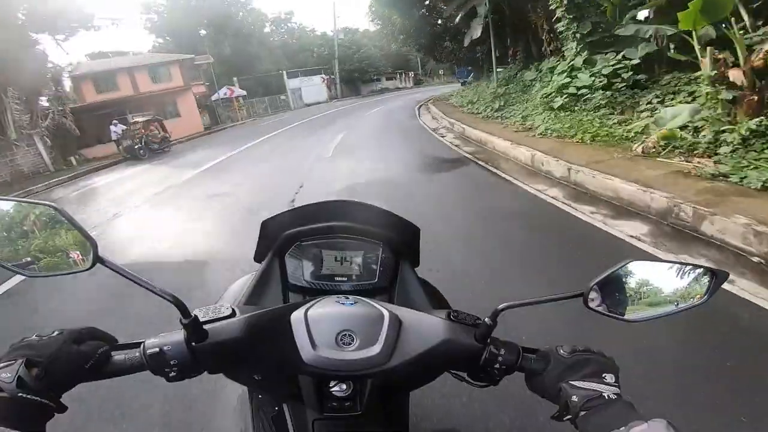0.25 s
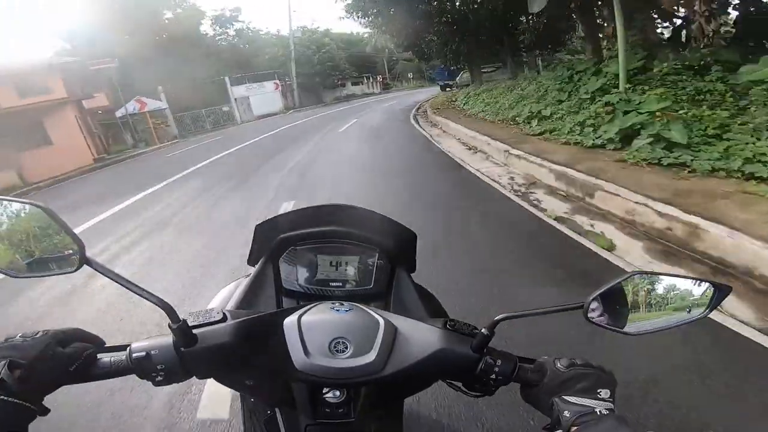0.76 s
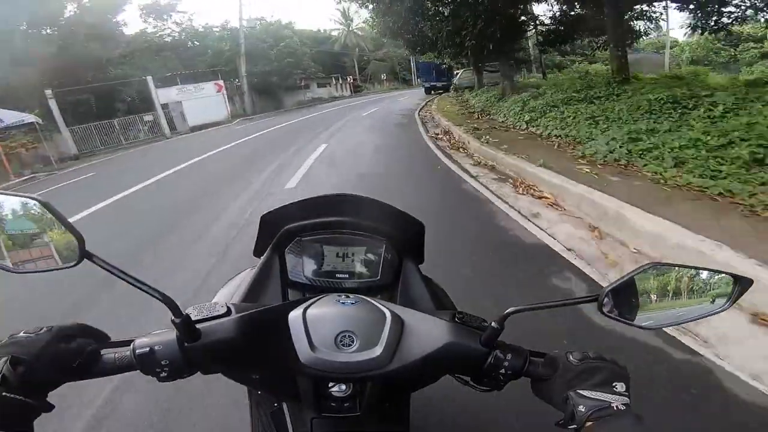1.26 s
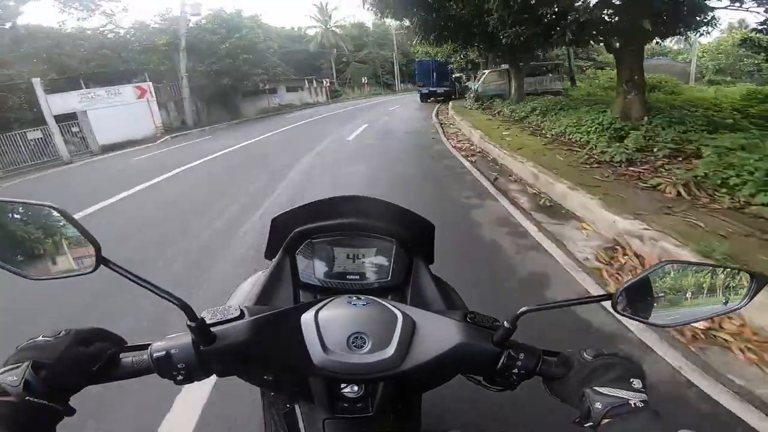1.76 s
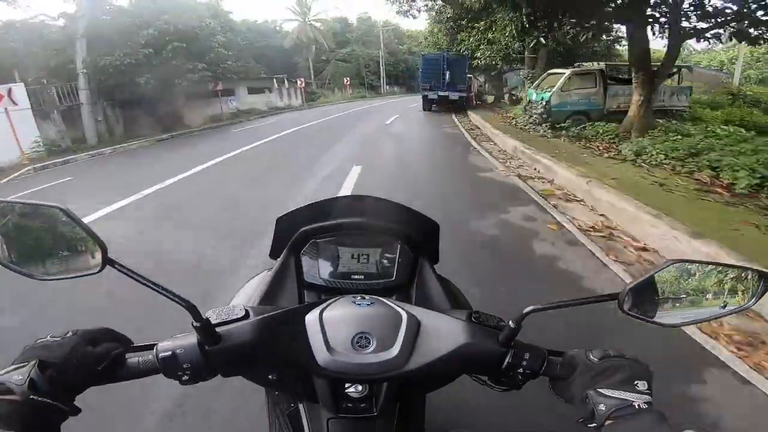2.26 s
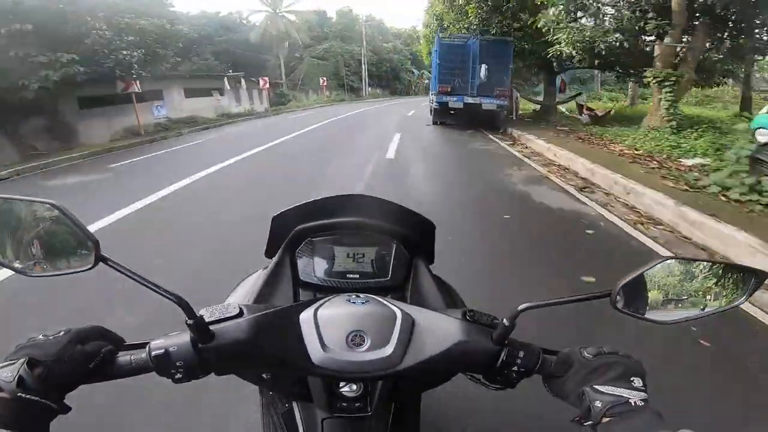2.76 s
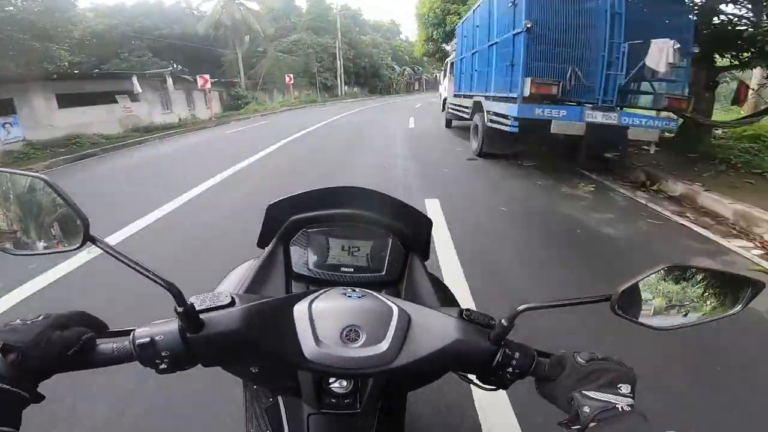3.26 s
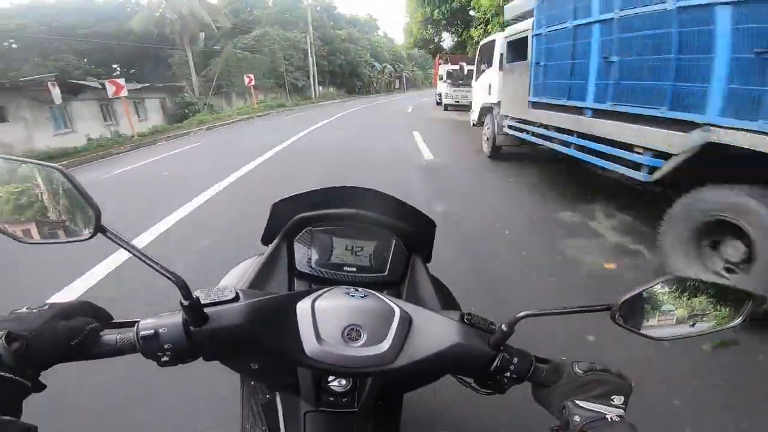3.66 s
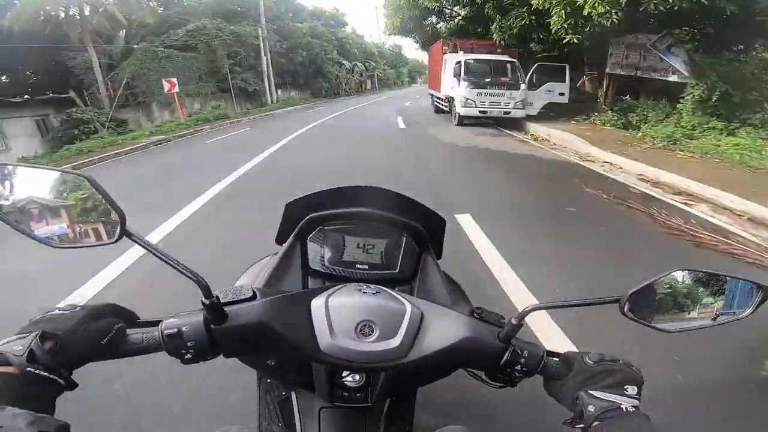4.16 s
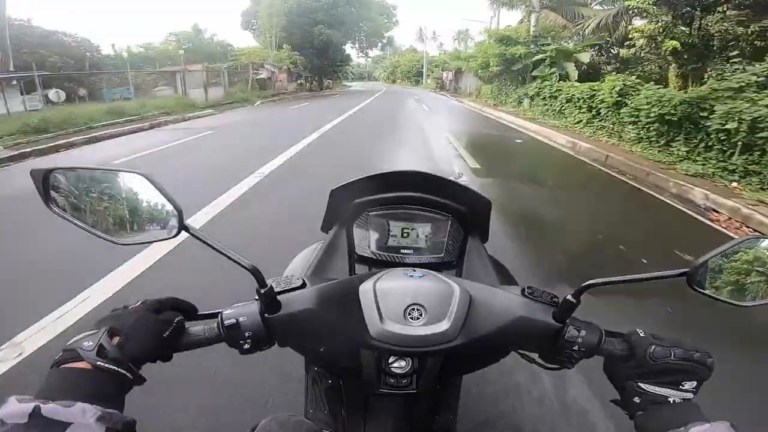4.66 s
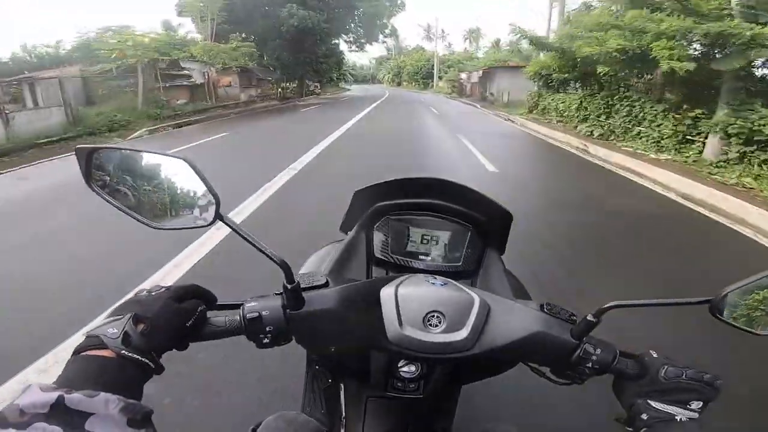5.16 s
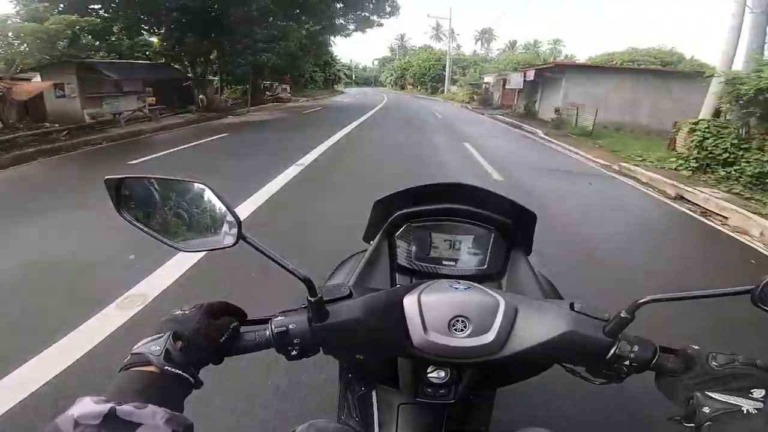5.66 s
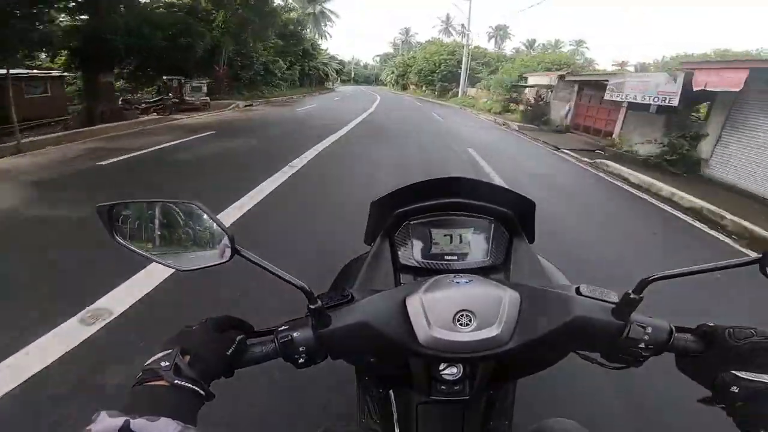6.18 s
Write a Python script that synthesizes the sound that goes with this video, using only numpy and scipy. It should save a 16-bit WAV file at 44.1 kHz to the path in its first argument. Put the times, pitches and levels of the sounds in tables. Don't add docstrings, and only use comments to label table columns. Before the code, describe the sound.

A small scooter drones along a wet road under rumbling wind, with a few bird whistles, then clicks abruptly into a faster, much louder ride.

```python
import sys
import numpy as np
from scipy import signal
from scipy.fft import rfft, irfft, next_fast_len
from scipy.io import wavfile
from scipy.ndimage import uniform_filter1d

SR = 44100
rng = np.random.default_rng(int(sys.argv[2]) if len(sys.argv) > 2 else 0)


def transcribe(u):
    v = np.clip(np.atleast_2d(u).T, -1, 1)
    q = np.round(v * 32767).astype(np.int16)
    wavfile.write(sys.argv[1], SR, q)


def volts_from_db(level):
    exponent = np.asarray(level, float) / 20
    return 10 ** exponent


N = 283122
TIME = np.arange(N) / SR


def level(x, db):
    return x * volts_from_db(db) / np.sqrt(np.mean(x ** 2))


def curve(table):
    s, *columns = np.transpose(table)
    return [np.interp(TIME, s, c) for c in columns]


def walk(rate_hz):
    k = int(SR / rate_hz)
    held = np.repeat(rng.standard_normal(N // k + 1), k)
    return 1.3 * uniform_filter1d(uniform_filter1d(held, k), k)[:N]


def plateau(centre_s, half_s):
    return np.exp(-((TIME - centre_s) / half_s) ** 4)


def ride(track, orders, wind, road, spray, tone_db, gear_db, shake, smear, wind_db, road_db, spray_db):
    # t/s, half length/s, level/dB
    patches = [
        (0.799, 0.14, 1),
        (2.9, 0.27, 0.5),
        (5.5, 0.59, 0.3),
    ]
    firing_hz, gust_db = curve(track)
    lorry_db = 3.5 * plateau(4, 0.4)
    wet_db = sum(db * plateau(s, half_s) for s, half_s, db in patches)
    throttle_db = 0.5 * (firing_hz - np.mean(track, axis=0)[1]) + lorry_db / 3
    cycles = np.cumsum(firing_hz * (1 + 0.001 * walk(8))) / SR
    throb = shake * (np.cos(2 * np.pi * cycles) + 0.7 * np.cos(4 * np.pi * cycles))

    motor = volts_from_db(tone_db) * exhaust(firing_hz, cycles, orders, wander_db=1.4, slip=0.3, smear=smear)
    motor = motor + volts_from_db(gear_db) * valve_gear(cycles, scatter_db=2.5, case_hz=1350, width_hz=350)
    air = volts_from_db(gust_db + wind_db) * wind_buffet(wind)
    tyres = volts_from_db(lorry_db + 0.078 * gust_db + road_db) * (1 + throb) * tyre_roar(road)
    hiss = volts_from_db(0.13 * gust_db + wet_db + spray_db) * (1 + throb / 3) * spray_hiss(spray)
    fizz = volts_from_db(spray_db - 21) * wet_db * patch_fizz()
    return air + tyres + hiss + fizz + volts_from_db(throttle_db) * motor


def exhaust(hz, cycles, orders, wander_db, slip, smear):
    out = 0
    for k, order_db in orders:
        lift_db = body_db(k * hz)
        db = order_db + lift_db - lift_db.mean() + wander_db * walk(7)
        phase = 2 * np.pi * (k * cycles + smear * rng.random()) + slip * walk(6)
        out = out + volts_from_db(db) * np.sin(phase)
    return out


def body_db(hz):
    # f/Hz, width/Hz, level/dB
    body = [
        (423, 24, 9),
        (460, 22, 5),
        (1545, 70, 9),
    ]
    return sum(db / (1 + (2 * (hz - f) / w) ** 2) for f, w, db in body)


def valve_gear(cycles, scatter_db, case_hz, width_hz):
    knocks = np.diff(np.floor(cycles), prepend=0) * volts_from_db(scatter_db * rng.standard_normal(N))
    b, a = signal.iirpeak(case_hz, case_hz / width_hz, fs=SR)
    return level(signal.lfilter(b, a, signal.lfilter(b, a, knocks)), 0)


def wind_buffet(spectrum):
    return rush(spectrum, swell_db=0.6, flicker_db=1.1, flicker_hz=9)


def tyre_roar(spectrum):
    return rush(spectrum, swell_db=0.5, flicker_db=1.5, flicker_hz=10)


def spray_hiss(spectrum):
    return rush(spectrum, swell_db=0.5, flicker_db=0.9, flicker_hz=18)


def patch_fizz():
    return rush([(5000, -6), (8000, 2.5), (11000, -13)], swell_db=2.5, flicker_db=3, flicker_hz=25.1)


def rush(spectrum, swell_db, flicker_db, flicker_hz):
    hz, db = np.transpose(spectrum)
    size = next_fast_len(N)
    octave = np.log2(np.maximum(np.arange(size // 2 + 1) * SR / size, 1))
    colour_db = np.interp(octave, np.log2(hz), db, left=-99, right=-99)
    noise = rfft(rng.standard_normal(size)) * volts_from_db(colour_db)
    out, swell = 0, swell_db * walk(2.79)
    for centre in np.arange(np.log2(hz[0]), np.log2(hz[-1]) + 0.5, 0.5):
        weight = np.clip(1 - 2 * np.abs(octave - centre), 0, 1)
        band = irfft(noise * weight, size)[:N]
        out = out + band * volts_from_db(swell + flicker_db * walk(flicker_hz))
    return level(out, 0)


def birds():
    # t/s, length/s, top f of strongest partial/Hz, sag/(Hz/s), level/dB
    bird = [
        (2.318, 0.11, 3110, 1700, -51),
        (2.558, 0.105, 3310, 3500, -46.5),
        (2.795, 0.108, 3300, 900, -43.5),
        (3.043, 0.108, 3270, 2900, -44),
    ]
    reply = [
        (2.832, 0.058, 4130, 500, -58.5),
        (3.076, 0.052, 3990, 300, -56),
    ]
    # t/s, f/Hz, level/dB
    far = [
        (.28, 4500, -62),
        (.745, 4500, -62),
        (1.335, 4700, -62),
        (1.865, 4600, -61),
        (2.295, 4700, -61),
        (2.745, 4200, -60),
    ]
    near = sum(whistle(call_shape(*call), [(1, 0), (3 / 2, -20), (2, -27)]) for call in bird)
    answer = sum(whistle(call_shape(*call, drop_share=0.95), [(1, 0)]) for call in reply)
    calls = (near + answer) * volts_from_db(1.6 * walk(90))
    echo = volts_from_db(-20) * np.roll(calls, int(0.07 * SR))
    chips = sum(chip(*call) for call in far)
    return calls + echo + chips


def chip(s, hz, db):
    return whistle([(s - 0.006, 1.15 * hz, db + 1.5), (s + 0.01, 0.88 * hz, db - 3)], [(1, 0)])


RISE_S = 0.01293


def call_shape(start_s, length_s, top_hz, sag, db, drop_share=0.89):
    drop_s = 0.03
    low_hz = top_hz - sag * (length_s - RISE_S - drop_s)
    end_s = start_s + length_s
    return [(start_s, 0.94 * top_hz, db - 12), (start_s + RISE_S, top_hz, db),
            (end_s - drop_s, low_hz, db - 2.5), (end_s, drop_share * low_hz, db - 9)]


def whistle(call, partials):
    hz, db = curve(call)
    start_s, end_s = call[0][0], call[-1][0]
    ends = np.clip(np.minimum(TIME - start_s, end_s - TIME) / 0.0051, 0, 1)
    quaver = 0.009 * np.cos(2 * np.pi * 22 * (TIME - start_s - RISE_S))
    phase = 2 * np.pi * np.cumsum(hz * (1 + quaver + 0.004 * walk(90))) / SR
    closing_db = -85 * np.clip(TIME - start_s, 0, 0.2)
    tone = sum(volts_from_db(d + (r > 1) * closing_db) * np.sin(r * phase) for r, d in partials)
    return np.sqrt(2) * ends * volts_from_db(db) * tone


def electronics_whine():
    # f/Hz, level/dB
    whine = [(8446, -100.5), (10481, -99), (13921, -99), (14077, -99), (14702, -93), (14858, -98),
             (15014, -100), (15170, -100), (15326, -96.5), (15482, -99)]
    return sum(np.sqrt(2) * volts_from_db(db) * np.sin(2 * np.pi * hz * TIME) for hz, db in whine)


def scene():
    # t/s, firing f/Hz, gust level/dB
    slow_track = [(0.0, 39.6, -1), (0.35, 39.79, 1), (0.83, 40.02, 1), (1.19, 41.05, 1),
                  (1.77, 40.54, -0.5), (2.4, 39.56, 0.3), (2.67, 40.92, -1.5), (2.94, 40.78, -1.5),
                  (3.25, 39.33, -2.5), (3.71, 40.36, -3.5), (3.97, 42.55, -0.5), (4.33, 42.37, -4)]
    fast_track = [
        (4.36, 56.4, -0.38),
        (4.8, 57.02, -1),
        (5.17, 56.94, -0.7),
        (5.59, 57.38, 0.58),
        (6.05, 56.18, 0.5),
        (6.42, 55.8, 1.67),
    ]
    # multiple of firing f, level/dB
    slow_orders = [(1, -37), (2, -37), (3, -41), (4, -36), (6, -46), (7, -49), (8, -44), (9, -41),
                   (10, -37.5), (11, -37), (12, -46), (13, -42), (14, -46), (15, -46), (16, -47), (20, -54),
                   (21, -54), (22, -53), (24, -55), (27, -53), (29, -52), (31, -49), (33, -53), (35, -53)]
    fast_orders = [(1, -27.3), (2, -24.8), (3, -35.4), (4, -31.8), (5, -43.9), (6, -41.5), (7, -31.7),
                   (8, -24.8), (9, -38.1), (10, -30), (11, -41.4), (12, -38.8), (13, -50.8), (14, -40.4),
                   (15, -45.5), (16, -45.7), (17, -47.1), (18, -44.3), (19, -46.7), (20, -45.0),
                   (21, -43.5), (22, -43.4), (23, -40), (24, -39), (25, -39.6), (26, -43.4), (27, -34.8),
                   (28, -48.2)]
    # f/Hz, density level/dB
    slow_wind = [(5.9, -35), (10, 1), (27, 0), (103, -11), (163, -18.5), (188, -19.5), (338, -29),
                 (400, -24.5), (520, -36), (880, -120)]
    fast_wind = [(5.9, -33), (10, 7.5), (38, 0.5), (115, -8), (194, -17), (233, -12.5), (312, -24.5),
                 (400, -28), (520, -21.5), (880, -120)]
    slow_road = [(200, -1.5), (300, -6), (400, -8), (520, -4.5), (640, -6.5), (720, -8), (1000, -11.5),
                 (1250, -11.5), (1480, -10.5), (1620, -16), (1800, -22), (2400, -41.5)]
    fast_road = [(200, -9), (300, 1), (400, -2.5), (520, -5.5), (640, -1.5), (720, -4.5), (1000, -9),
                 (1250, -9), (1480, -9.5), (1620, -13), (1800, -14.5), (2400, -41.5)]
    slow_spray = [(1400, -44), (1900, -3.5), (2400, -3.5), (2650, -9), (2900, -11), (3600, -14),
                  (4700, -18), (5800, -19.5), (6800, -27.5), (8200, -31), (10000, -37.5), (12500, -48),
                  (15700, -67)]
    fast_spray = [(1400, -30.5), (1900, -1), (2400, 0.5), (2650, -2), (2900, -12), (3600, -12.5),
                  (4700, -16), (5800, -18), (6800, -22.5), (8200, -29.5), (10000, -40.5), (12500, -52.5),
                  (15700, -72.5)]
    slow = ride(slow_track, slow_orders, slow_wind, slow_road, slow_spray, tone_db=0.15, gear_db=-56.5,
                shake=0.085, smear=0.46, wind_db=-21.3, road_db=-35.9, spray_db=-53)
    fast = ride(fast_track, fast_orders, fast_wind, fast_road, fast_spray, tone_db=-1.26, gear_db=-47,
                shake=0.16, smear=0.85, wind_db=-13.5, road_db=-27.8, spray_db=-38.1)
    slow = (slow + birds()) * np.clip(TIME / 0.006, 0, 1)
    change = int(4.3499 * SR)
    jump = -0.3 + slow[change - 1] - fast[change]
    fast = fast + jump * np.exp(-np.abs(TIME - TIME[change]) / 0.002)
    return np.where(np.arange(N) < change, slow, fast)[None]


def roll_off(x):
    return signal.sosfilt(signal.butter(12, 15750, fs=SR, output="sos"), x)


def record(dry):
    self_noise = level(rng.standard_normal(N), -72.5)
    return roll_off(dry + electronics_whine() + self_noise)


dry = scene()
out = record(dry)
transcribe(out)
```